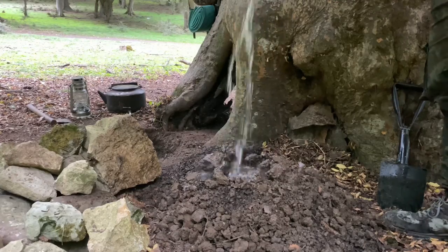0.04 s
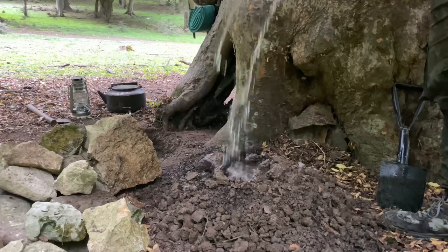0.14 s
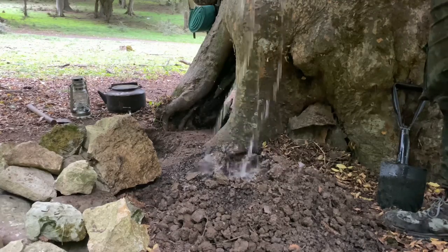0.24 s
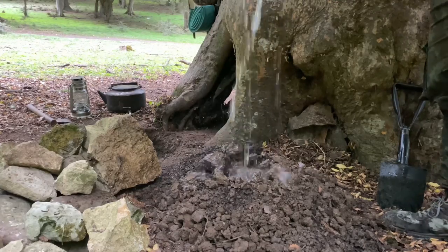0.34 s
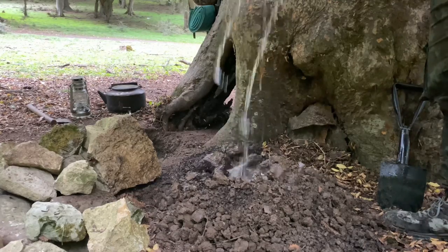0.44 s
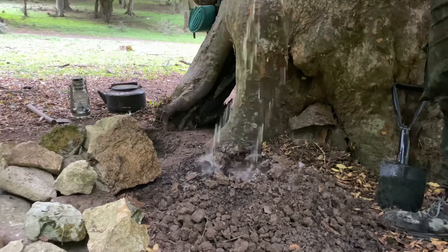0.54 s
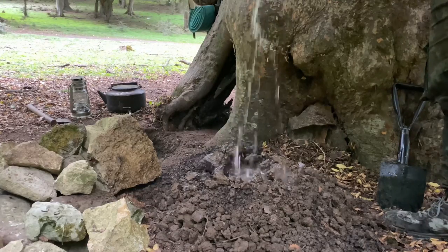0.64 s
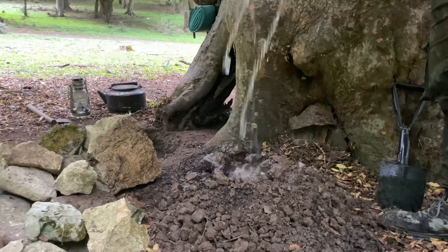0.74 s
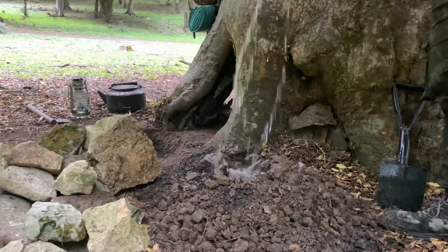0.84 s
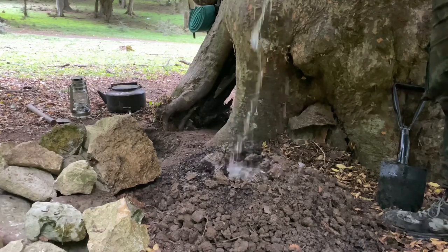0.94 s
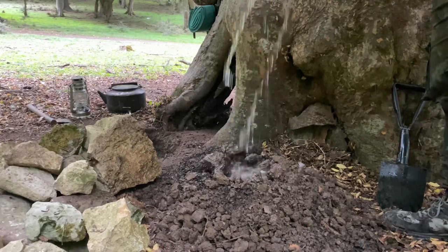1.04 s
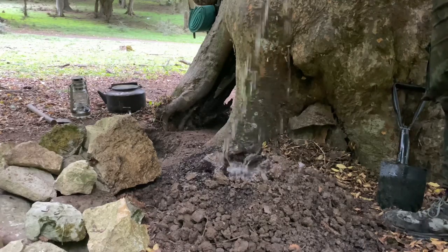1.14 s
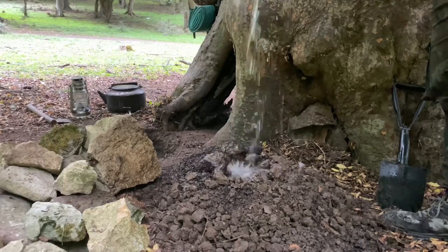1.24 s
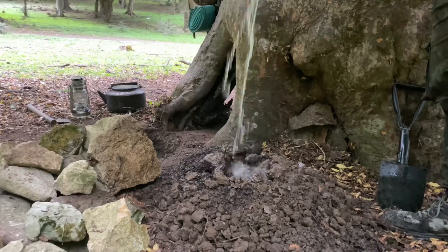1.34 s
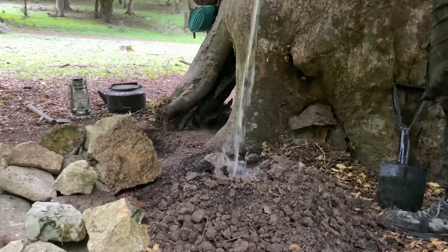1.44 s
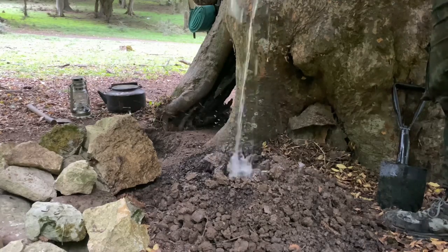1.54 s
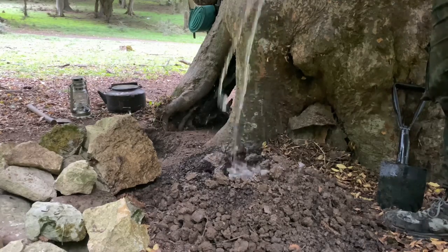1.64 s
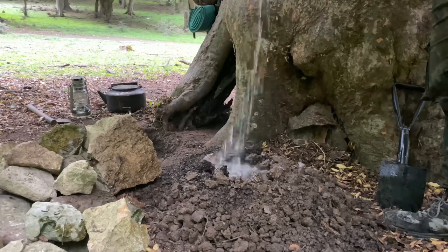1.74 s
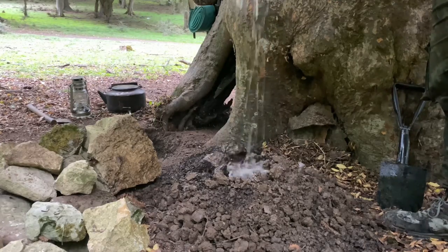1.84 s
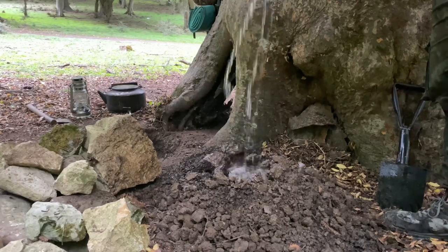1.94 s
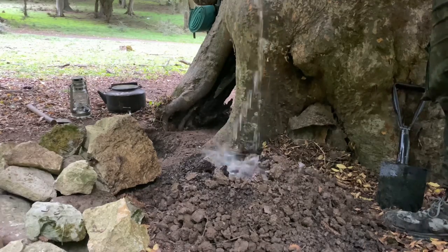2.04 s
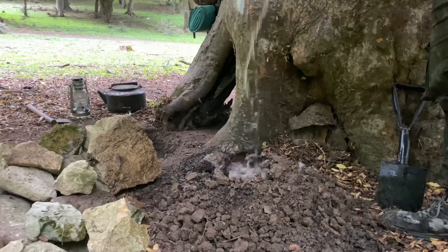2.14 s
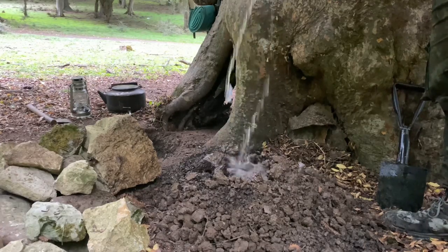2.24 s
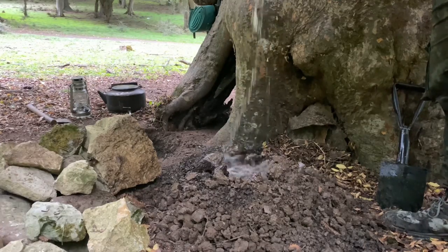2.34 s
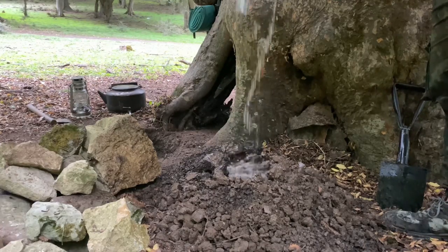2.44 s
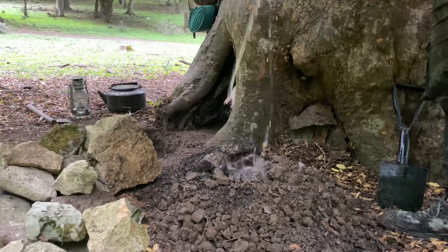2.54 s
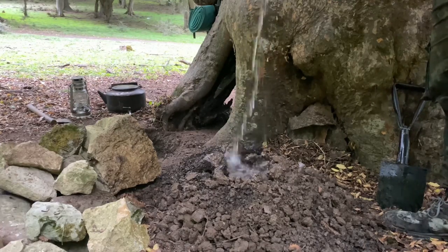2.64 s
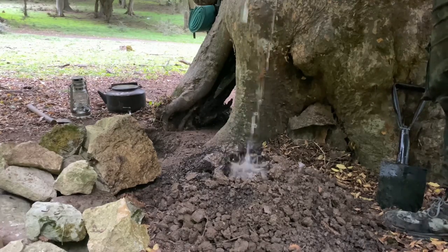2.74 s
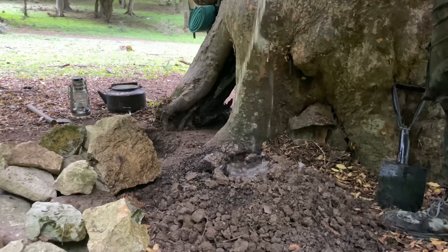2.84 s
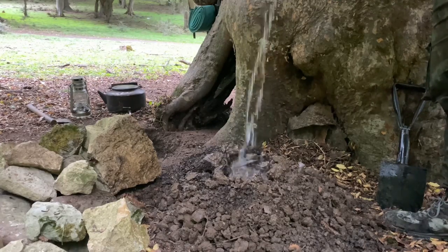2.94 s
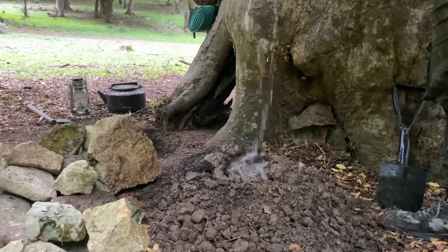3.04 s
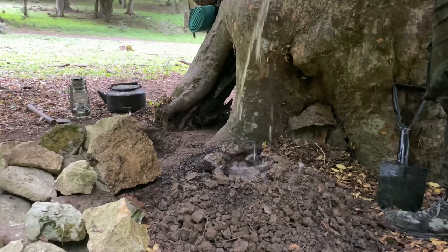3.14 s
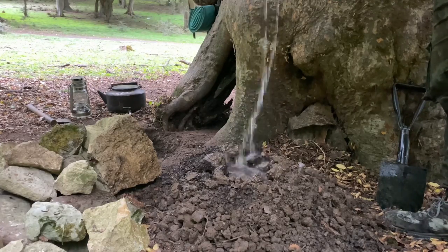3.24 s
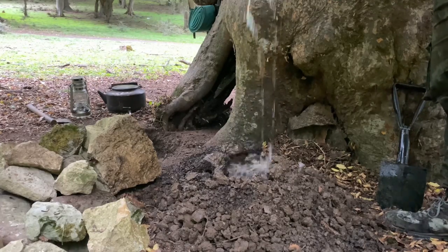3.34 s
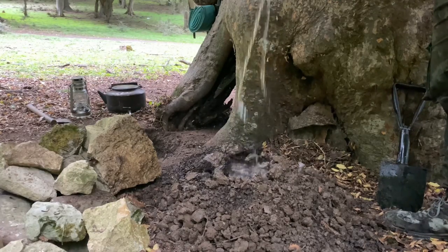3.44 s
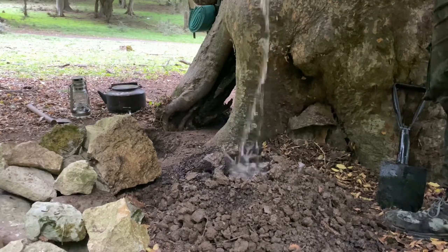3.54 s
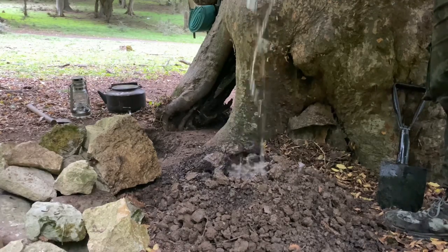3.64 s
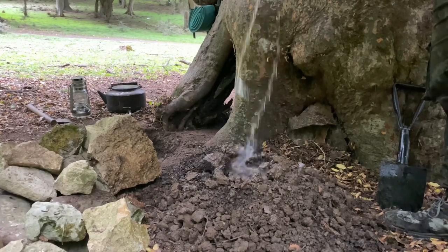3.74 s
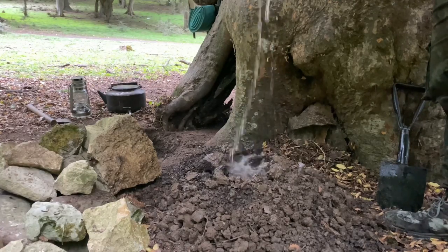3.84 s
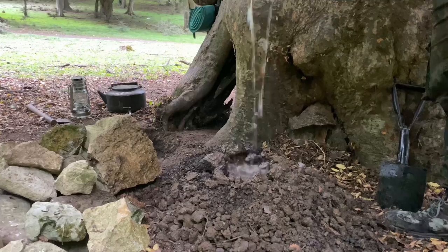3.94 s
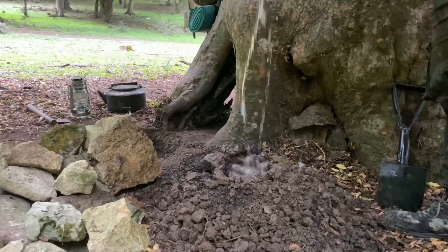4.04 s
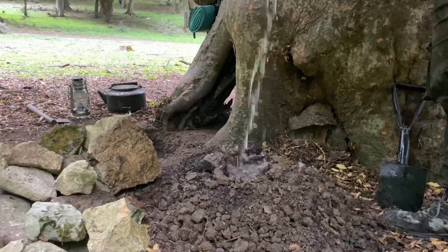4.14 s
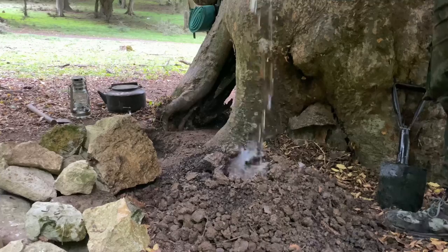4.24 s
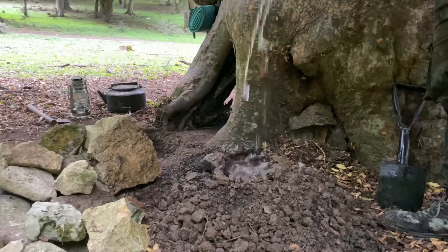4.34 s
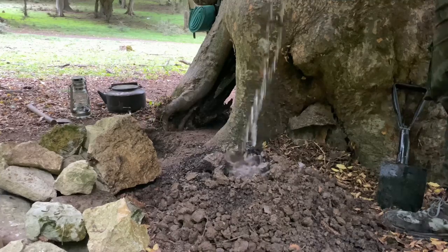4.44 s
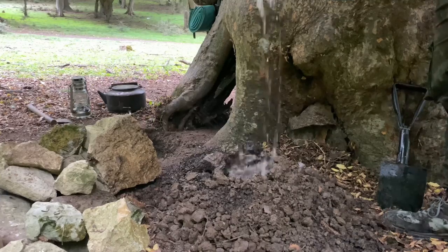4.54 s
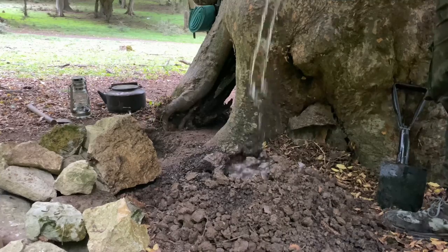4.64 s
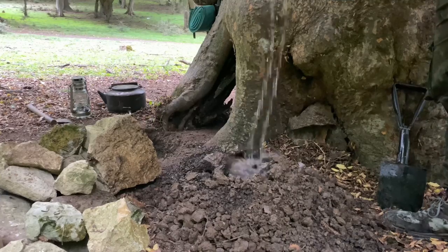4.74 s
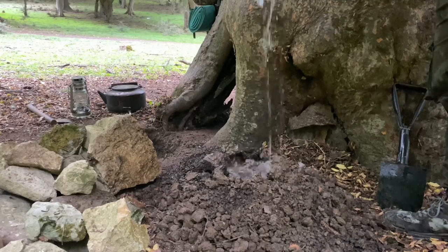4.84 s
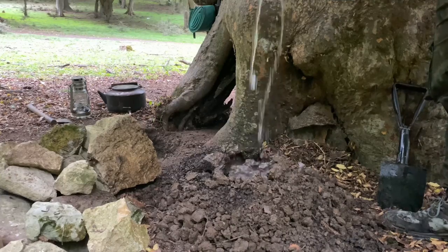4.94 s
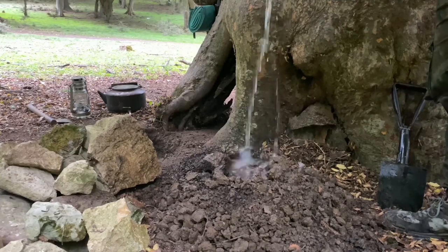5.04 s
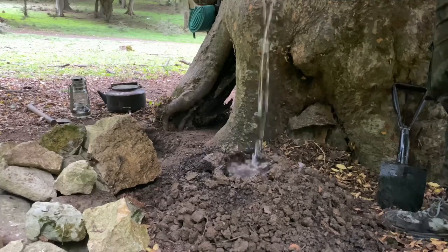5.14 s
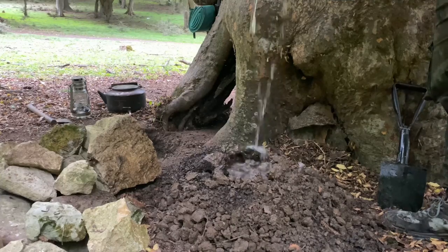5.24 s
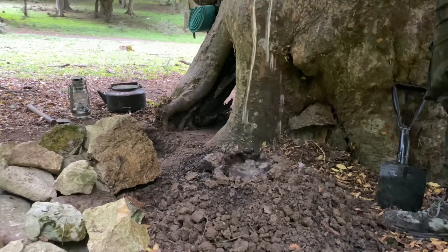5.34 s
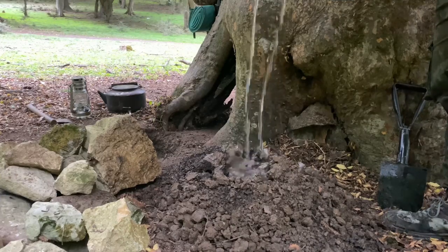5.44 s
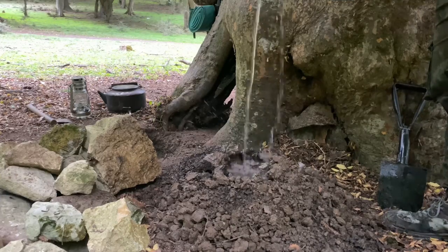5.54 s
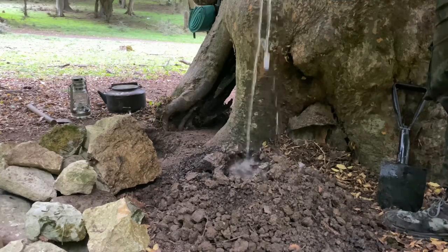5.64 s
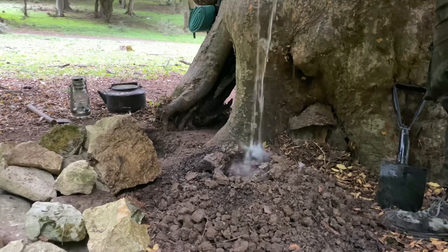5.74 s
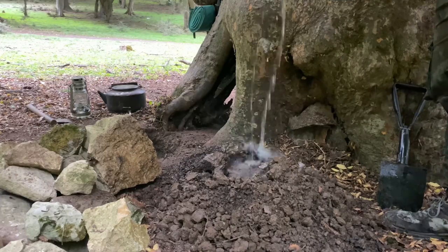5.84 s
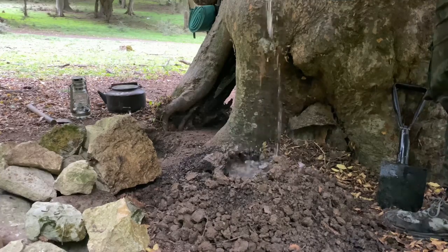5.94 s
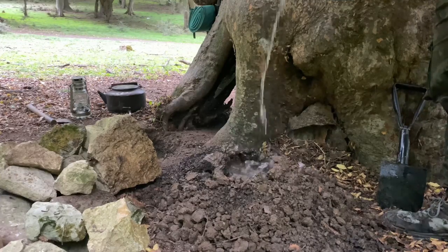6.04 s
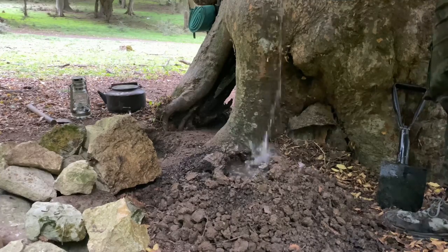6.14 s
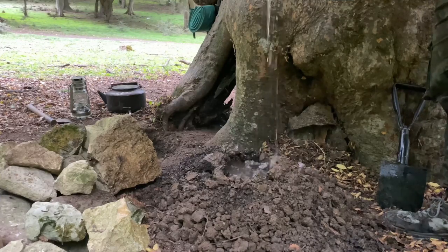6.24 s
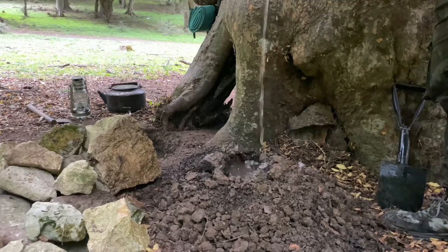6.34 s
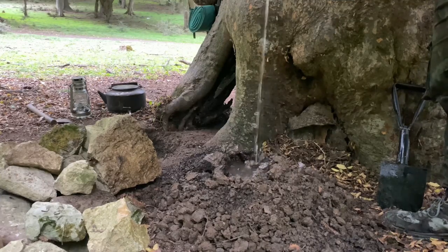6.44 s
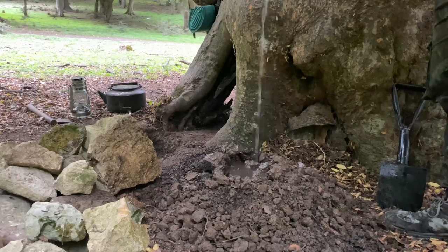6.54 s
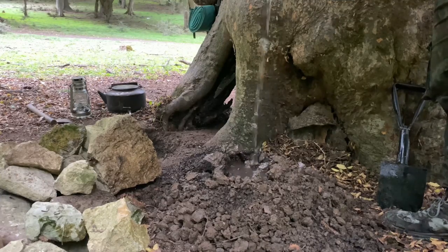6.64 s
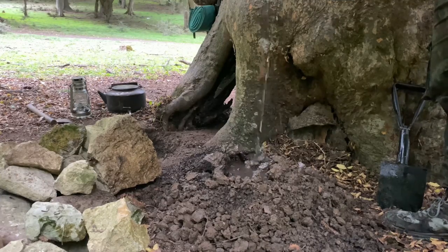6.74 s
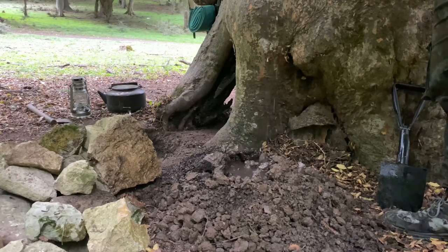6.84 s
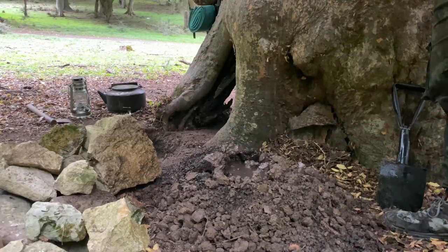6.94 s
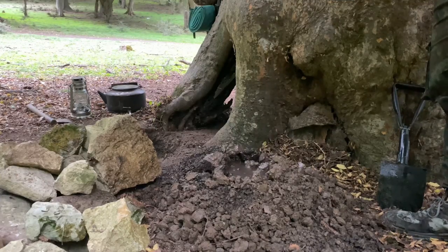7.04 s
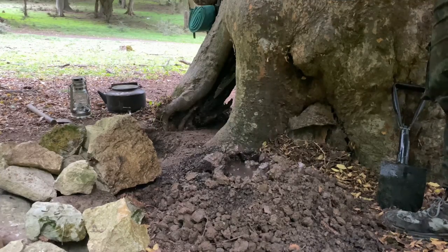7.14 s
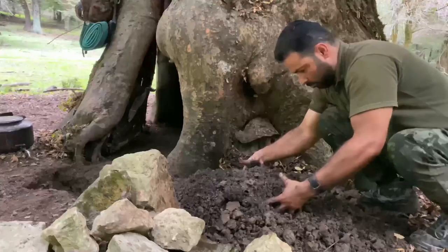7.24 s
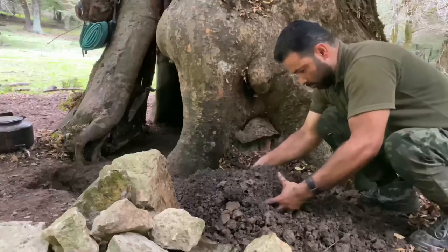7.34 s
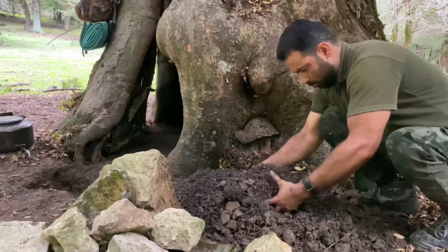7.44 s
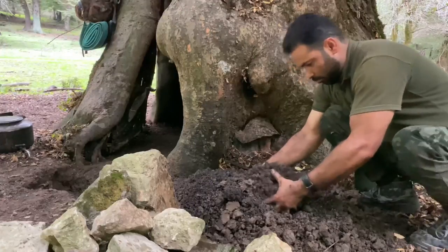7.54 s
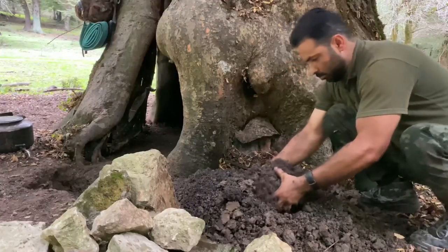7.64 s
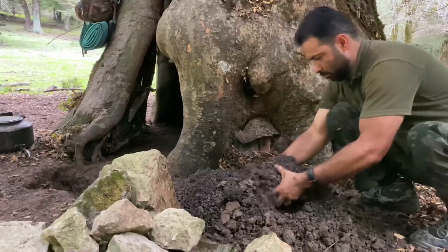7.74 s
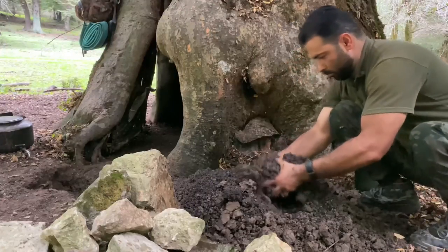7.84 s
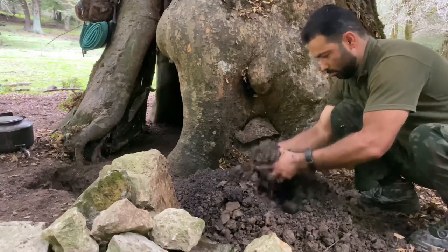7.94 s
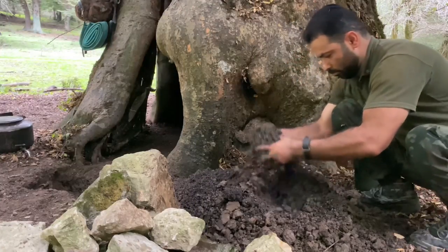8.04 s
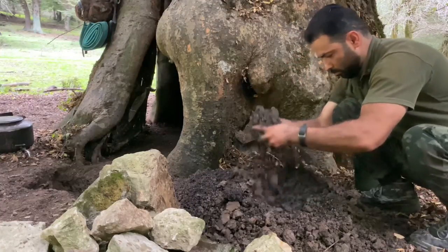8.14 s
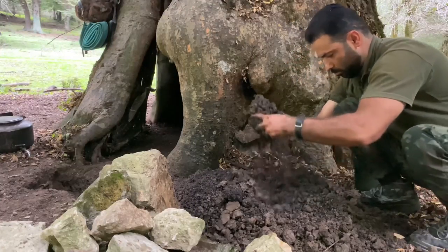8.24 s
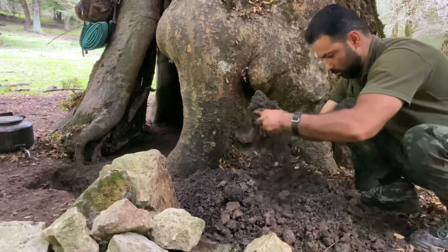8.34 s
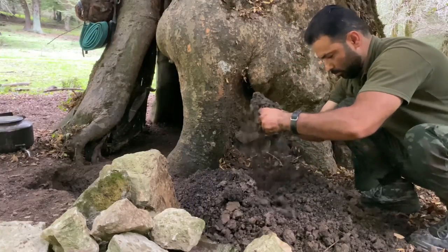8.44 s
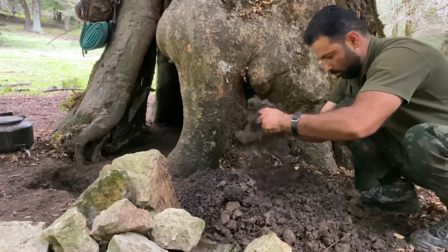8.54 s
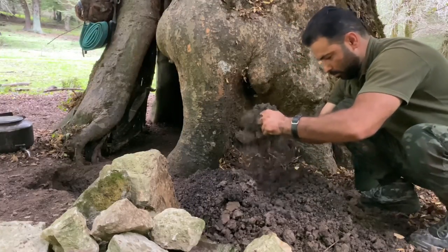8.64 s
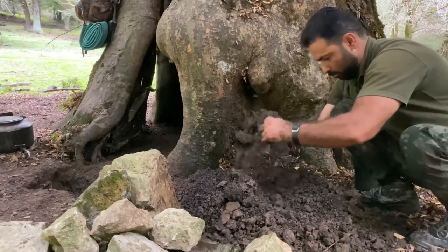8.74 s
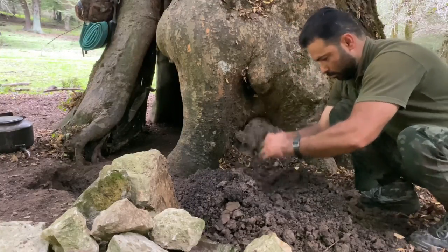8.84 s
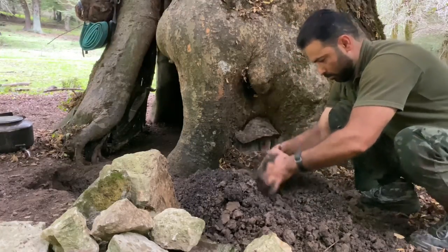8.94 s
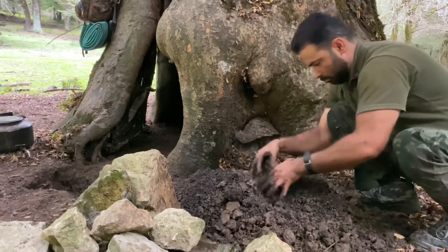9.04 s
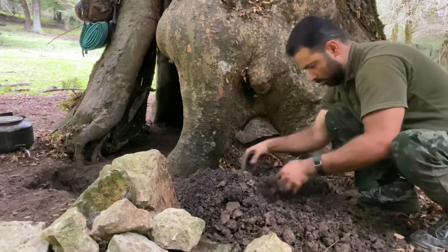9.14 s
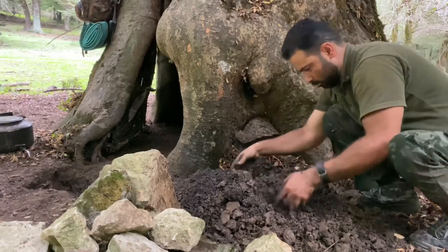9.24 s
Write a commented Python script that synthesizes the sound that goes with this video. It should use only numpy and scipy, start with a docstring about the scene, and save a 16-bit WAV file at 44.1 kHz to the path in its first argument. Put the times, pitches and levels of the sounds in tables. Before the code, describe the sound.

Outdoors, close up, water falls in irregular surges into a muddy hollow in loose dirt: crisp spray, slapping lumps, bubbling and low gulps, with a few deep plops. After about six seconds it weakens to separate drips while a faint bird whistles far off. An abrupt cut brings a louder, breezy background and hands crumbling soil with trickling grains, crackles, ticks and dull thuds.

```python
"""Water poured from above runs down a tree trunk and splatters into a muddy hollow in loose dirt.
Its surges are noise-puff spray and ringing bubbles; lumps slap in cracks and splats, dig gulping craters
whose pitch sinks while trapped air rings, and plunge with a plop. The flow then thins to drips, bubbles of
rising pitch, as a far bird whistles in arched tones. The quiet background, a filtered noise, cuts to a second
scene, louder and breeze-like, in which hands crumble soil: trickling grains, crackling crumbs, ticks, thuds."""
import sys
import numpy as np
from scipy import signal
from scipy.fft import rfft, irfft, next_fast_len
from scipy.io import wavfile
from scipy.ndimage import uniform_filter1d, map_coordinates

SR = 44100
rng = np.random.default_rng(int(sys.argv[2]) if len(sys.argv) > 2 else 0)


def transcribe(u):
    """Save the signal u as a 16-bit wav file named by the first command-line argument.

    u: samples, shape (n,) or (channels, n), limited to [-1, 1]; the rate is SR.
    q: integer samples, one column per channel.
    """
    v = np.clip(np.atleast_2d(u).T, -1, 1)
    q = np.round(v * 32767).astype(np.int16)
    wavfile.write(sys.argv[1], SR, q)


N = 410130


def amp(db):
    """Logarithmic level: decibels to amplitude gain."""
    return 10 ** (np.asarray(db) / 20)


def unit(x):
    """Normalisation: scale to an rms of 1."""
    return x / np.sqrt(np.mean(x ** 2) + 1e-20)


def along(points, hz):
    """Logarithmic frequency scale: (frequency [Hz], value) points read between their knots."""
    f, v = np.transpose(points)
    return np.interp(np.log(hz + 1), np.log(f + 1), v)


def curves(rows):
    """Linear interpolation: one value per sample for each column after the time."""
    s, *cols = np.transpose(rows)
    return [np.interp(np.arange(N) / SR, s, c) for c in cols]


def wobble(rate):
    """Slow random modulation: a smooth curve through rate random knots a second."""
    knots = rng.standard_normal(int(N * rate / SR) + 4)
    return map_coordinates(knots, [np.arange(N) * rate / SR])


def filtered(x, response):
    """Linear filtering: the spectrum of x times a response of frequency."""
    m = next_fast_len(N + 8192)
    return irfft(rfft(x, m) * response(np.fft.rfftfreq(m, 1 / SR)), m)[..., :N]


def coloured(x, spectrum):
    """Spectral shaping: x filtered by (frequency [Hz], gain [dB]) points."""
    return filtered(x, lambda hz: amp(along(spectrum, hz)))


def bursts(s, size, life):
    """Impact noise, mid and side: each blow's energy decays exponentially, its amplitude over life seconds."""
    energy = np.bincount(np.clip(s * SR, 0, N).astype(int).ravel(), size.ravel() ** 2, N + 1)[:N]
    energy = signal.lfilter([1], [1, -np.exp(-2 / (life * SR))], energy)
    return np.sqrt(energy) * rng.standard_normal((2, N))


def rings(s, size, hz, cycles, glide, count, onset=10):
    """Damped resonance of air pockets, mid and side: pitch slides from hz by the factor glide as they decay."""
    s, size, hz = [np.reshape(v, (-1, 1)) for v in (s, size, hz)]
    # age in decay times, each lasting the given cycles; the swell is onset times faster
    age = np.arange(count) / SR * hz / cycles
    phase = 2 * np.pi * np.cumsum(hz * glide ** (1 - np.exp(-age)), axis=1) / SR
    swell = size * np.exp(-age) * (1 - np.exp(-onset * age)) * np.sqrt(np.linspace(1, 0, count))
    where = (np.abs(s * SR).astype(int) + np.arange(count)).ravel()
    # a random phase between mid and side gives each pocket its own bearing
    bearing = rng.uniform(0, 2 * np.pi, s.shape)
    voices = [(swell * np.sin(phase + turn)).ravel() for turn in (0, bearing)]
    return np.array([np.bincount(where, voice, N)[:N] for voice in voices])


def shatter(s, db, spread, fade_db, count):
    """Fragmentation: share each blow's energy among count pieces over spread seconds, as times and sizes."""
    late = (np.arange(count) + rng.uniform(0, 1, (len(s), count))) / count
    size = amp(fade_db * late + 3.95 * rng.standard_normal(late.shape))
    share = size / np.linalg.norm(size, axis=1, keepdims=True)
    return s[:, None] + spread * late, amp(db)[:, None] * share


def shower(scatter_db, count):
    """Random arrivals: times and sizes of count drops, the sizes exponentially scattered in dB."""
    return rng.uniform(0, N / SR, count), amp(scatter_db * np.minimum(rng.exponential(1, count), 4))


def clumping(life, scatter_db, count):
    """Shot-noise intermittency: power near mean 1 in count lumps, each fading within life seconds."""
    s, size = shower(scatter_db=scatter_db, count=count)
    impulses = np.bincount((s * SR).astype(int), size ** 2, N)
    power = signal.lfilter([1], [1, -np.exp(-1 / (life * SR))], impulses)
    return power / (np.abs(uniform_filter1d(power, size=3000)) + 1e-9)


def microphones(mid_side, likeness):
    """Interchannel coherence: the likeness of left and right splits each frequency into mid and side."""
    turn = lambda hz: np.arccos(np.clip(along(likeness, hz), -1, 1)) / 2
    mid, side = filtered(mid_side, lambda hz: np.array([np.cos(turn(hz)), np.sin(turn(hz))]))
    return np.array([mid + side, mid - side])


# the moment of the abrupt cut from the first scene to the second [s]
CUT_S = 7.215
# backgrounds of the first and the second scene: (frequency [Hz], relative level [dB per Hz])
QUIET = [(15, -32), (25, -18), (62, 16), (112, 3.5), (1170, -7.5), (3750, -48), (4380, -17.5),
         (5530, -46.5), (6620, -16), (12000, -19), (15600, -55.5), (22000, -120)]
BREEZE_LIKE = [(15, -45), (25, -23), (49, 2), (121, -2.5), (183, -8.5), (219, -7.5), (440, -6), (718, -10),
               (776, -7.5), (1140, -10), (1640, -14), (6980, -22.5), (12000, -37), (15600, -63),
               (22000, -120)]
# left-right likeness of the background: (frequency [Hz], coherence [-1 to 1])
DIFFUSE_LIKENESS = [(60, 0.68), (300, 0.44), (700, -0.18), (3000, 0.082), (11000, 0.21), (13300, -0.55),
                    (15400, .6)]


def background():
    """Filtered broadband noise: a quiet background cuts abruptly to a louder, softly wavering, breeze-like one."""
    after = np.clip((np.arange(N) / SR - CUT_S) / 0.012, 0, 1)
    quiet = amp(-78.5) * unit(coloured(rng.standard_normal((2, N)), QUIET))
    breeze_like = unit(coloured(rng.standard_normal((2, N)), BREEZE_LIKE))
    breeze_like = amp(-63.5 + wobble(6.1) / 2) * breeze_like
    return microphones((1 - after) * quiet + after * breeze_like, DIFFUSE_LIKENESS)


# a far bird's thin arched whistles: (start [s], length [s], pitch at mid-call [Hz], relative level [dB],
# share by which the pitch falls from mid-call to the end on top of the arch [1])
WHISTLES = [(6.96, .112, 4830, -75, -.05), (7.115, .088, 4600, -77, 0.045)]
# share of the mid-call pitch by which the arch starts and ends lower
WHISTLE_ARCH = 0.1


def bird():
    """Frequency modulation: a tone arches up and down, made uneven by its path through the trees."""
    t, song = np.arange(N) / SR, np.zeros(N)
    for start, length, top_hz, db, sag in WHISTLES:
        along_call = np.clip(2 * (t - start) / length - 1, -1, 1)  # -1 at the start, 1 at the end
        arch = 1 - WHISTLE_ARCH * along_call ** 2 - sag * along_call
        hz = top_hz * arch * (1 + .022 * wobble(500))
        level = amp(db - 2 + 4 * wobble(110)) * (1 - along_call ** 8)
        song += level * np.sin(2 * np.pi * np.cumsum(hz) / SR)
    return song


# soil trickling from the hands: (time [s], relative level [dB])
SOIL = [(7.215, -110), (7.52, -84.5), (7.6, -74.5), (7.8, -75), (7.92, -79), (8.38, -72.5), (8.49, -64.5),
        (8.56, -69), (8.63, -70), (8.78, -67.5), (8.84, -75.5), (8.97, -71.5), (9.03, -95.5)]
# bits of soil landing: (time [s], relative tick level [dB], relative thud level [dB])
CLODS = [(7.254, -76, -67), (7.44, -76, -73), (7.67, -74, -76), (7.735, -74, -73), (7.944, -52, -90),
         (8.4504, -47.5, -69), (8.476, -60, -53.5), (8.492, -58, -70), (8.544, -60, -70), (8.591, -63, -72),
         (8.625, -65, -71), (8.671, -51.5, -72), (8.748, -65, -64), (8.773, -63, -76), (8.794, -61, -73)]
# spectrum of dry crumbs: (frequency [Hz], relative level [dB per Hz])
CRUMBS = [(200, -4), (1000, -6), (3000, 1.5), (5500, -2), (7000, 0), (10000, -6), (15000, -2)]


def soil():
    """Granular impact: fine soil trickles, coarser crumbs crackle, larger bits tick and thud on the heap."""
    s, size = shower(scatter_db=-1.0, count=7000)
    trickle = unit(coloured(bursts(s, size, life=.0004), CRUMBS))
    s, size = shower(scatter_db=1.8, count=2400)
    pitch = 2200 * np.exp(0.5 * rng.standard_normal(len(s)))
    crackle = unit(rings(s, size, pitch, cycles=1.86, glide=1, count=200))
    s, tick_db, thud_db = np.transpose(CLODS)
    thuds = bursts(*shatter(s, thud_db + 18.5, spread=0.008, fade_db=-14, count=5), life=0.0023)
    thuds = coloured(thuds, [(100, -5), (400, 1.0), (1500, 2), (3300, 0.5), (4400, -17), (10000, -28)])
    ticks = coloured(bursts(s, amp(tick_db), life=0.0007), CRACK)
    falling = amp(curves(SOIL)[0]) * (amp(2.5) * trickle + amp(-7.0) * crackle)
    return falling + thuds + ticks


# the falling water drums on the ground: level relative to the flow [dB]
DRUMMING_DB = -21.5
# spectrum of the soft ground: (frequency [Hz], relative level [dB per Hz])
GROUND = [(25, -24), (55, 1.5), (85, 0), (130, -17), (400, -52.5), (2000, -120)]


def drumming(weight):
    """Momentum transfer: the water's weight strikes the soft ground in dull, irregular thuds."""
    s, size = shower(scatter_db=0.0, count=500)
    return amp(DRUMMING_DB) * weight * unit(coloured(bursts(s, size, life=0.0089), GROUND))


# single bubbles out of the splashing, the last ones from drips:
# (time [s], relative level [dB], starting pitch [Hz])
DRIPS = [(0.009, -31, 1540), (0.566, -32, 3570), (0.591, -30.5, 3080), (0.674, -30.5, 1800),
         (0.939, -30, 2980), (0.975, -30, 2950), (1.056, -28.5, 2790), (1.156, -26, 3180),
         (1.269, -34.5, 1420), (1.537, -29, 3670), (1.56, -29, 1750), (1.717, -35, 3000),
         (1.948, -21.5, 2750), (2.053, -39, 2980), (2.149, -32, 2260), (2.18, -34, 2090),
         (2.262, -35.5, 1360), (2.437, -25, 4120), (2.584, -30, 3000), (2.804, -32, 1920),
         (2.852, -32, 3480), (2.962, -34, 1360), (3.031, -33, 3070), (3.32, -37, 3110), (3.348, -33, 3110),
         (3.442, -36, 3000), (3.562, -27, 3050), (3.608, -36, 1580), (3.685, -37, 1980), (4.059, -36, 2030),
         (4.25, -36, 1340), (4.281, -18, 2240), (4.39, -32, 2540), (4.571, -27.5, 3030),
         (4.867, -32.5, 3050), (5.096, -32, 2880), (5.411, -26, 1670), (5.587, -37, 1310),
         (5.609, -36, 3050), (5.944, -31, 3270), (5.968, -34.5, 2600), (6.109, -33, 1640),
         (6.196, -42, 1850), (6.223, -43, 1960), (6.250, -34.5, 1680), (6.305, -51, 1180),
         (6.408, -41, 2300), (6.432, -38, 1640), (6.452, -38, 2620), (6.487, -37, 2550), (6.509, -34, 1610),
         (6.55, -36, 2530), (6.586, -35, 2530), (6.665, -45, 1900), (6.941, -45, 1670), (7.010, -57, 1790),
         (7.067, -55, 2590), (7.122, -52, 3200)]


def drips():
    """Bubble resonance: a single drop traps air that rings briefly and rises in pitch."""
    s, db, hz = np.transpose(DRIPS)
    return rings(s, amp(db), hz, cycles=4.8, glide=1.063, count=1200)


# big lumps that plunge deep: (time [s], relative splash level [dB], relative plop level [dB],
# median plop pitch [Hz], relative cavity level [dB], starting thump pitch [Hz])
PLUNGES = [(1.927, -47, -31.5, 1010, -46, 135), (1.947, -40, -45, 905, -55, 135),
           (1.966, -41, -33.5, 940, -54.5, 135), (3.4076, -28, -23, 1094, -27.5, 150),
           (3.84, -27, -25, 1160, -46, 135), (4.953, -26.5, -24.5, 1220, -22.5, 125),
           (5.08, -30, -32, 1150, -40.5, 135)]
# a plop follows the first splash of its lump after this long [s]
PLOP_DELAY_S = 0.001805


def plunges():
    """Cavity resonance: a heavy lump splashes and plops; its cavity drops quickly to a low thump."""
    s, splash_db, plop_db, hz, cavity_db, thump_hz = np.transpose(PLUNGES)
    splash = bursts(*shatter(s, splash_db + 8.0, spread=0.006, fade_db=-15, count=10), life=0.00061)
    splash = coloured(splash, [(500, -4), (1500, 7.0), (2700, 1.5), (4000, 0), (6000, -15), (12000, -25)])
    times, size = shatter(s + PLOP_DELAY_S, plop_db + 4.0, spread=0.00391, fade_db=0, count=3)
    pitch = hz[:, None] * np.exp(0.22 * rng.standard_normal(times.shape))
    plop = rings(times, size, pitch, cycles=2.05, glide=1.01, count=900)
    cavity_hz = np.full(len(s), 610)
    cavity = rings(s + 0.0011, amp(cavity_db + 0.5), cavity_hz, cycles=3.6, glide=0.257, count=2400, onset=7.3)
    thump = rings(s + 0.0117, amp(cavity_db - 9.5), thump_hz, cycles=2.6, glide=0.51, count=3500, onset=4.4)
    return plop + splash + cavity + thump


# the deepest craters opening in the puddle:
# (time [s], relative crater level [dB], relative air pocket level [dB], reference pitch [Hz])
GULPS = [(0.141, -43.5, -53, 160), (0.228, -40.5, -47.5, 180), (0.426, -41, -49, 178),
         (0.508, -44, -53, 185), (0.649, -43.5, -44, 72), (0.711, -40, -47, 192), (0.783, -41.5, -48, 195),
         (0.852, -45.5, -58, 222), (0.997, -38.5, -45, 208), (1.056, -51, -45, 198),
         (1.097, -38.5, -47, 146), (1.153, -42.5, -57, 302), (1.310, -44.5, -44, 200),
         (1.56, -43, -45, 200), (1.618, -41, -47, 292), (2.054, -43, -50, 202), (2.27, -54, -52, 165),
         (2.304, -41, -46, 200), (2.52, -54, -65, 170), (2.604, -43.5, -46, 298),
         (2.845, -42.5, -44.5, 217), (2.92, -45.5, -51, 125), (3.012, -56, -52, 130),
         (3.098, -46, -46.5, 205), (3.17, -51, -56, 280), (3.211, -43, -55, 111), (3.52, -47, -57, 190),
         (3.56, -44, -55, 186), (3.804, -43, -49, 336), (4.03, -45.5, -51.5, 180), (4.151, -51, -56, 180),
         (4.473, -51, -54, 202), (5.21, -54, -54, 231), (5.255, -44.5, -62, 290), (5.408, -46, -57, 120),
         (5.489, -41.5, -51, 101), (5.66, -46.5, -53, 70), (5.755, -43.5, -55, 343),
         (5.929, -44.5, -47, 64.4), (6.106, -52, -60, 130), (6.368, -45.5, -58, 150), (6.45, -53, -68, 165),
         (6.473, -52, -68, 135), (6.532, -52, -62, 135), (6.567, -54, -64, 160), (6.619, -54, -63, 160),
         (6.784, -56, -70, 160), (6.853, -62, -71, 165)]
# the muddy hollow's low voice: (frequency [Hz], gain [dB])
HOLLOW = [(35, -7), (80, -1), (130, -3), (185, 1.8), (260, -0.5), (390, 2), (600, -5), (800, -7)]
# the pocket left by a crater rings once it has closed, after this long [s]
POCKET_DELAY_S = 0.01207
# deeper craters squelch more: offset from the crater column [dB], growth [dB per dB], usual crater [dB]
SQUELCH_DB, SQUELCH_GROWS, USUAL_GULP_DB = 0.5, 0.96, -42


def gulps(weight):
    """Cavity resonance: craters squelch and sink in pitch as they widen, their air pockets rise; churn beneath."""
    s, db, pocket_db, hz = np.transpose(GULPS)
    squelch_db = db + SQUELCH_DB + SQUELCH_GROWS * np.minimum(db - USUAL_GULP_DB, 2)
    times, size = shatter(s + 0.00393, squelch_db, spread=.025, fade_db=-11.0, count=5)
    pitch = 2.3 * hz[:, None] * np.exp(0.23 * rng.standard_normal(times.shape))
    squelch = rings(times, size, pitch, cycles=1.5, glide=0.72, count=2000)
    craters = rings(s + 0.00394, amp(db + 4), 1.707 * hz, cycles=3.16, glide=0.36, count=3000, onset=1.73)
    closed = s + POCKET_DELAY_S
    pockets = rings(closed, amp(pocket_db), 0.9 * hz, cycles=3.2, glide=1.22, count=4000, onset=2.5)
    s, size = shower(scatter_db=2.5, count=1100)
    pitch = 260 * np.exp(0.61 * rng.standard_normal(len(s)))
    churn = unit(rings(s, size, pitch, cycles=0.81, glide=0.69, count=2200))
    return coloured(squelch + craters + pockets + amp(-19.5) * weight * churn, HOLLOW)


# lighter lumps at random: splat over the bubbling, crack over the spray, scatter [dB]; median pitch [Hz]
LIGHT_SPLAT_DB, LIGHT_CRACK_DB, LIGHT_SCATTER_DB, LIGHT_HZ = -3, -9, 3, 2240


def light_lumps(spray_gain, bubbling_gain, count):
    """Stratified random arrivals: slap rows for count lighter lumps that follow the strength of the flow."""
    s = CUT_S * (np.arange(count) + rng.uniform(0, 1, count)) / count
    chance, at = rng.standard_normal((count, 3)), np.minimum(s * SR, N - 1).astype(int)
    splat_db = 20 * np.log10(bubbling_gain[at]) + LIGHT_SPLAT_DB + LIGHT_SCATTER_DB * chance[:, 0]
    crack_db = 20 * np.log10(spray_gain[at]) + LIGHT_CRACK_DB + LIGHT_SCATTER_DB * chance[:, 1]
    return np.column_stack([s, splat_db, crack_db, LIGHT_HZ * np.exp(0.28 * chance[:, 2])])


# spectrum of sharp cracks: (frequency [Hz], relative level [dB per Hz])
CRACK = [(300, -19), (1200, -17), (3000, -6.5), (4800, 4.5), (5500, -2.5), (7000, 5.5), (9000, 1.5),
         (12500, 1), (15500, 4.5)]


def slaps(lumps):
    """Liquid impact: a lump bursts in sharp cracks, a wet splat, then a patter of flung droplets."""
    s, splat_db, crack_db, hz = np.transpose(lumps)
    crack = bursts(*shatter(s - .0006, crack_db + 16.5, spread=.004, fade_db=-4.5, count=12), life=0.00031)
    # droplets running ahead of the lump land just before it
    forerunners = bursts(*shatter(s - .007, crack_db - 6, spread=0.0052, fade_db=18, count=5), life=0.0008)
    patter = bursts(*shatter(s + 0.0049, crack_db - 7.5, spread=0.026, fade_db=0, count=12), life=0.004)
    times, size = shatter(s - .0006, splat_db + 13.5, spread=0.005, fade_db=-6.5, count=5)
    pitch = hz[:, None] * np.exp(0.2 * rng.standard_normal(times.shape))
    splat = rings(times, size, pitch, cycles=2.56, glide=1.104, count=500)
    return coloured(forerunners + crack + patter, CRACK) + splat


# a surge builds up [s], sags while it lasts [dB/s] and drains away when it ends [extra dB/s]
SPRAY_RISE_S, SPRAY_SAG_DB_PER_S, SPRAY_RELEASE_DB_PER_S = 0.038, 36, 173.5
BUBBLING_RISE_S, BUBBLING_SAG_DB_PER_S, BUBBLING_RELEASE_DB_PER_S = 0.014, 15.5, 106


def swell(start, length, rise, sag_db, release_db):
    """Exponential envelope: the gain of one surge, every 64 samples, as it rises, sags and drains."""
    age = np.maximum(np.arange(0, N, 64) / SR - start, 0)
    return (1 - np.exp(-age / rise)) * amp(-sag_db * age - release_db * np.maximum(age - length, 0))


# the stream's surges: (start [s], length [s], relative spray level [dB], relative bubbling level [dB])
SURGES = [(-0.067, 0.17, -40.5, -44), (0.12, 0.17, -38.5, -45), (0.416, 0.17, -44.5, -46.5),
          (0.62, 0.063, -43.5, -52.5), (0.808, 0.19, -38.5, -46), (1.082, 0.2, -40.5, -45.5),
          (1.388, 0.41, -39.5, -39.5), (1.668, 0.19, -37, -45), (1.993, 0.17, -40, -44.5),
          (2.235, 0.26, -40, -45), (2.48, 0.16, -40.5, -48.5), (2.635, 0.36, -42, -46),
          (2.932, 0.19, -40.5, -45), (3.212, 0.28, -45, -45.5), (3.516, 0.088, -36.5, -41),
          (3.7, 0.065, -38.5, -44.5), (3.833, 0.12, -41, -46.5), (3.995, 0.12, -42, -45.5),
          (4.139, 0.26, -38, -44.5), (4.445, 0.11, -36, -43.5), (4.717, 0.14, -41, -46),
          (4.932, 0.19, -42, -52.5), (5.173, 0.12, -40.5, -48), (5.419, 0.28, -40.5, -41),
          (5.7, 0.28, -39, -56), (6.078, 0.14, -44.5, -51.5), (6.343, 0.29, -47.5, -51.5),
          (6.63, 0.18, -51, -62)]
# the thin trickle beneath the surges, which finally dries up: (time [s], relative spray level [dB])
TRICKLE = [(0, -48), (5.9, -54.5), (6.85, -64.5), (6.93, -67), (7.21, -80), (7.3, -120)]
# the stream tears and dwindles, then returns at once: (end [s], length [s], depth at the end [dB])
TEARS = [(0.133, 0.024, 4.5), (0.413, .03, 9), (0.51, 0.044, 6.5), (0.665, 0.048, 3), (1.091, 0.032, 10),
         (1.358, 0.02, 18), (2.008, 0.015, -0.5), (2.496, .03, 11), (2.886, .03, 9), (3.207, 0.031, 4),
         (3.74, 0.046, 4.5), (4.379, 0.075, 6.5), (4.706, 0.11, 0), (4.95, 0.038, 3), (5.16, .02, 8),
         (5.395, .04, 6), (6.369, 0.021, 7)]


def flow():
    """Power addition: surges overlap on the trickle to give spray and bubbling gains, both cut by the tears."""
    spray, bubbling = 0, 0
    for s, length, spray_db, bubbling_db in SURGES:
        spray_swell = swell(s, length, SPRAY_RISE_S, SPRAY_SAG_DB_PER_S, SPRAY_RELEASE_DB_PER_S)
        spray = spray + (amp(spray_db) * spray_swell) ** 2
        bubbling_swell = swell(s, length, BUBBLING_RISE_S, BUBBLING_SAG_DB_PER_S, BUBBLING_RELEASE_DB_PER_S)
        bubbling = bubbling + (amp(bubbling_db) * bubbling_swell) ** 2
    per_sample = lambda power: np.interp(np.arange(N), np.linspace(0, N, len(power)), np.sqrt(power))
    trickle = amp(curves(TRICKLE)[0])
    t = np.arange(0, N, 64) / SR
    loss_db = sum(db * np.clip(1 + (t - end) / length, 0, 1) * (t < end) for end, length, db in TEARS)
    torn = per_sample(amp(-loss_db) ** 2)
    spray_gain = torn * np.hypot(per_sample(spray), trickle)
    return spray_gain, torn * np.hypot(per_sample(bubbling), amp(-14.5) * trickle)


# a stronger flow traps lower bubbles: fall [octaves per dB] above a usual bubbling level [dB]
DEEPEN_OCT_PER_DB, USUAL_BUBBLING_DB = 0.13, -46.5


def trapped(bubbling_gain, s):
    """Inverse size-pitch law: a stronger flow traps larger, lower bubbles; their pitch factor at times s."""
    excess_db = 20 * np.log10(bubbling_gain[(s * SR).astype(int)]) - USUAL_BUBBLING_DB
    return 2 ** (-DEEPEN_OCT_PER_DB * np.maximum(excess_db, 0))


# spectra of droplets and of bubbles: (frequency [Hz], relative level [dB per Hz])
SPRAY = [(150, -7.5), (600, -13.5), (1200, -6.5), (3000, 2), (4900, 2.5), (5450, 0.5), (6100, 1),
         (7200, 2.5), (9000, -0.5), (12500, -2), (15500, 0.5)]
BUBBLING = [(200, -20), (600, -16), (1200, -7), (2500, -2), (4500, 1.5), (9000, -7.5)]
# in a gush lumps run together and no bubble rings freely: bubbling level [dB] at which this is half so
GUSH_DB = -41.5


def stream(spray_gain, bubbling_gain):
    """Droplet impact and bubble resonance: spray crackles on mud and traps air, in partly shared clumps."""
    gush = 1 / (1 + (amp(GUSH_DB) / bubbling_gain) ** 4)
    shared = clumping(life=0.0044, scatter_db=2.5, count=2100)
    s, size = shower(scatter_db=-0.5, count=26000)
    spray = unit(coloured(bursts(s, size, life=0.00057), SPRAY) * np.sqrt(shared + 0.16))
    # tiny bubbles, each at its own high pitch, are gone within 400 samples
    s, size = shower(scatter_db=2.5, count=5000)
    pitch = 3000 * 5 ** rng.uniform(0, 1, len(s))
    fizz = unit(coloured(rings(s, size * pitch, pitch, cycles=38, glide=1.03, count=400), SPRAY))
    # mud damps the larger bubbles quickly
    s, size = shower(scatter_db=2.5, count=9000)
    pitch = 2100 * trapped(bubbling_gain, s) * np.exp(0.42 * rng.standard_normal(len(s)))
    bubbles = rings(s, size, pitch, cycles=1.8, glide=1.074, count=300)
    lumpy = shared + clumping(life=0.0019, scatter_db=4.0, count=1000)
    fine = 2.3 * clumping(life=0.001, scatter_db=2.0, count=3000)
    bubbles = unit(coloured(bubbles, BUBBLING) * np.sqrt((1 - gush) * lumpy + gush * fine))
    # a few bubbles ring on freely
    s, size = shower(scatter_db=3.5, count=700)
    pitch = 2500 * np.exp(0.291 * rng.standard_normal(len(s)))
    plips = unit(rings(s, size, pitch, cycles=9.3, glide=1.08, count=900))
    droplets = amp(1.02) * spray + amp(-4.5) * fizz
    return spray_gain * droplets + bubbling_gain * (amp(-3.0) * bubbles + amp(-8.0) * (1 - gush) * plips)


# the heaviest lumps of water hitting the mud:
# (time [s], relative splat level [dB], relative crack level [dB], median splat pitch [Hz])
SLAPS = [(0.056, -41.5, -49, 2160), (0.249, -38, -49, 2400), (0.382, -43.5, -31.5, 3640),
         (0.42, -40, -44, 2450), (0.516, -42, -49, 2400), (0.674, -41, -30, 1900), (0.718, -48, -44, 1570),
         (0.808, -40, -34, 2040), (0.861, -43, -35, 2300), (0.917, -39.5, -40.5, 2460),
         (0.992, -43, -53.5, 1690), (1.038, -36, -40.5, 3300), (1.095, -37, -29.5, 2500),
         (1.155, -34.5, -39.5, 2300), (1.244, -34.5, -48, 2660), (1.36, -40, -41.5, 3000),
         (1.367, -35, -33.5, 1930), (1.396, -44, -37.5, 2700), (1.405, -36, -46.5, 2740),
         (1.439, -29.5, -40.5, 2630), (1.504, -33.5, -40.5, 2140), (1.536, -45, -36.5, 3600),
         (1.559, -36, -50, 1810), (1.603, -38.5, -61, 1390), (1.661, -42.5, -51, 1280),
         (1.716, -48.5, -46.5, 2680), (1.763, -33, -46.5, 2700), (1.841, -34.5, -39, 2880),
         (1.947, -33, -40, 2700), (2.016, -45, -34, 2820), (2.038, -39.5, -40, 2600),
         (2.059, -40, -51, 1570), (2.102, -36.5, -46, 2700), (2.235, -45, -40, 2800), (2.3, -41, -43, 4100),
         (2.315, -55, -38.5, 3700), (2.424, -48, -39.5, 2300), (2.435, -31.5, -44, 2570),
         (2.451, -30, -41, 2100), (2.503, -43, -35, 2150), (2.675, -39, -52, 2750), (2.7, -43, -40, 1980),
         (2.732, -55, -39.5, 3450), (2.755, -42, -39.5, 2320), (2.851, -45.5, -40, 1700),
         (2.889, -58, -43.5, 3000), (2.92, -50.5, -37.5, 2700), (2.954, -40, -47.5, 2470),
         (2.972, -48, -36.5, 3400), (2.994, -34, -41, 3130), (3.028, -43, -35.5, 2200),
         (3.041, -44, -38, 1900), (3.081, -45, -37.5, 2520), (3.113, -41, -49, 1850),
         (3.146, -58, -45.5, 3000), (3.213, -47, -34.5, 2870), (3.222, -40.5, -55, 1900),
         (3.274, -42, -35, 2750), (3.287, -56, -35, 3130), (3.327, -40.5, -37, 2170),
         (3.304, -48, -38, 3100), (3.476, -47, -43, 2720), (3.519, -36, -28.5, 1380),
         (3.556, -31, -48.5, 2100), (3.653, -41, -35, 2270), (3.658, -37.5, -45.5, 2250),
         (3.76, -42, -46, 1830), (3.808, -53, -37, 2560), (3.842, -33.5, -32.5, 1290),
         (3.862, -35, -54, 1770), (3.873, -40.5, -51.5, 1950), (4.013, -45, -37, 2000),
         (4.12, -42.5, -39, 2840), (4.19, -29, -33, 3120), (4.207, -53, -38.5, 2620),
         (4.417, -59, -39, 2300), (4.437, -38, -29, 3470), (4.479, -48, -37, 2200),
         (4.534, -36, -41.5, 3370), (4.557, -55, -39.5, 3000), (4.569, -36.5, -43.5, 3170),
         (4.696, -48, -40, 3030), (4.73, -47, -35, 2500), (4.741, -50, -38, 2800),
         (4.799, -34, -43.5, 3870), (4.843, -41, -57.5, 1860), (5.045, -42, -35.5, 2300),
         (5.124, -61, -40, 3200), (5.144, -35, -44, 3630), (5.168, -38.5, -39.5, 2600),
         (5.268, -49, -42.5, 2530), (5.332, -42.5, -39, 1660), (5.395, -56, -43, 3000),
         (5.41, -36, -31.5, 1860), (5.425, -39, -50, 2300), (5.471, -34, -35.5, 2260),
         (5.553, -45, -45.5, 1310), (5.755, -32, -36.5, 2120), (5.784, -69, -34.5, 1900),
         (5.855, -37, -30, 3660), (5.908, -41.5, -50, 1670), (6.107, -40, -40.5, 1710),
         (6.131, -57, -41.5, 3400), (6.321, -44, -47, 2700), (6.37, -41, -38.5, 2800),
         (6.447, -45, -51, 2430), (6.466, -41, -56, 2280), (6.508, -54, -57, 1720),
         (6.518, -40.5, -60.5, 2670), (6.537, -51, -56.5, 1640), (6.563, -42.5, -61.5, 1820),
         (6.617, -41, -53.5, 2550), (6.634, -45, -53, 2230), (6.704, -49, -43.5, 2550),
         (6.719, -63, -46, 3000), (6.756, -42.5, -48, 2630), (6.781, -40.5, -48, 2100),
         (6.857, -65, -42.5, 3620), (6.887, -74, -48, 3540)]
# as the puddle drains, drops strike firmer mud and end up sharper: (time [s], top treble change [dB])
DRAINING = [(0, -1), (5.2, -2), (5.7, 1), (6.9, 1.5)]


def splashing(spray_gain, bubbling_gain):
    """Superposition with a moving treble shelf: stream and slaps together, brighter in the end."""
    lumps = np.vstack([SLAPS, light_lumps(spray_gain, bubbling_gain, count=90)])
    water = stream(spray_gain, bubbling_gain) + slaps(lumps)
    top = filtered(water, lambda hz: np.clip((hz - 8000) / 4000, 0, 1))
    return water + (amp(curves(DRAINING)[0]) - 1) * top


def surroundings(x, t60, wet_db):
    """Diffuse scattering: trunk and stones return a short, weak echo, new every quarter second."""
    t, wet = np.arange(SR // 4) / SR, np.zeros((2, N + SR))
    for start in range(0, N, len(t)):
        tail = rng.standard_normal((2, len(t))) * amp(-60 * t / t60) * (t > .002)
        echo = signal.fftconvolve(x[:, start:start + len(t)], tail / np.linalg.norm(tail[0]), axes=1)
        wet[:, start:start + echo.shape[1]] += echo
    return x + amp(wet_db) * wet[:, :N]


# left-right likeness of near sounds: (frequency [Hz], coherence [-1 to 1])
NEAR_LIKENESS = [(350, .93), (2400, .8), (3400, .3), (4700, .33), (5700, -.2), (6800, .68), (8100, -.25),
                 (9200, -.28), (10200, .95), (11600, .9), (12800, -.92), (14000, -.9), (15400, .95)]
# ripples in the response to near sounds: (frequency [Hz], gain [dB])
RIPPLE = [(1900, 0), (2500, -0.5), (3000, 1), (3700, 0), (4400, -0.5), (5100, 0.5), (5450, -2), (5750, 1),
          (6150, -2), (6600, 1), (7300, 0), (7750, -1), (8400, 0)]
# level difference of the ports: (frequency [Hz], left minus right [dB])
LEAN = [(50, -1), (250, -4), (1000, -1.6), (4000, 0), (8000, -1.7), (12000, -0.5)]
# phase difference of the ports: (frequency [Hz], lead of the left [rad])
LEAD = [(1200, 0.45), (2400, 0.51), (3300, 1.5), (4400, 1.2), (5400, 0.28)]


def scene():
    """Interchannel level and phase differences: water and soil a little to the right, in open air."""
    spray_gain, bubbling_gain = flow()
    weight = np.sqrt(spray_gain * bubbling_gain)  # how heavily the water falls
    puddle = gulps(weight) + drumming(weight) + plunges() + drips()
    sources = splashing(spray_gain, bubbling_gain) + puddle + soil()
    near = surroundings(sources, t60=0.08, wet_db=-10.5)

    def ports(hz):
        """Each port takes half of the level and phase difference, with opposite signs."""
        level = amp(np.outer([.5, -.5], along(LEAN, hz)))
        return level * np.exp(1j * np.outer([.5, -.5], along(LEAD, hz)))
    return filtered(microphones(coloured(near, RIPPLE), NEAR_LIKENESS), ports) + background() + bird()


# upper band limit [Hz]
TOP_HZ = 15850


def record(dry):
    """Band limiting: a third-order high-pass at 44 Hz sheds deep bass; nothing passes above the limit."""
    return filtered(dry, lambda hz: (hz < TOP_HZ) * hz ** 3 / np.sqrt(hz ** 6 + 44 ** 6))


dry = scene()
out = record(dry)
transcribe(out)
```